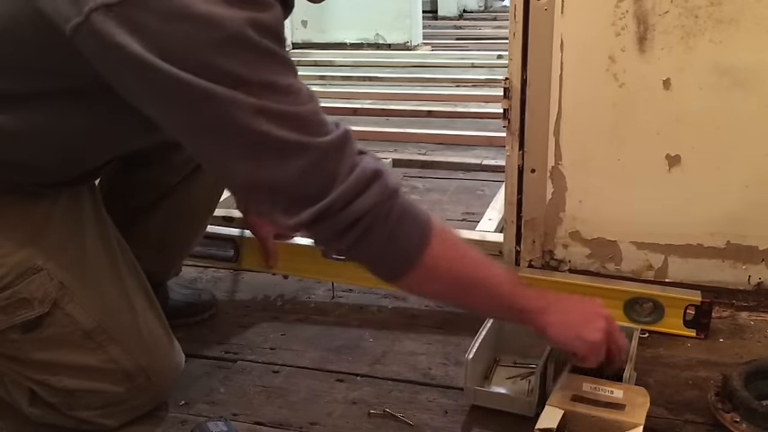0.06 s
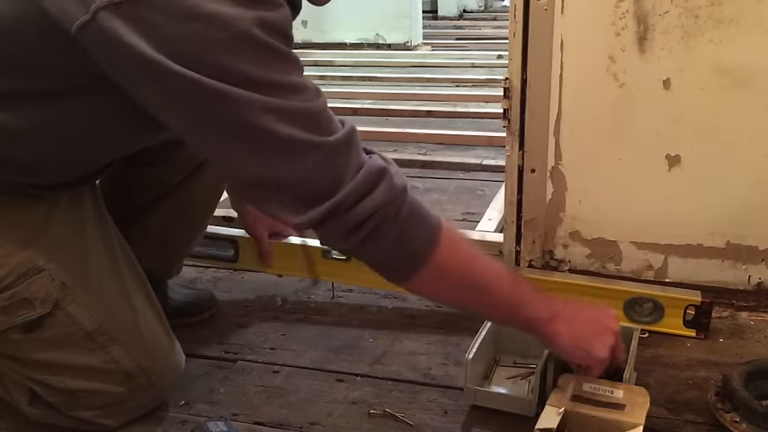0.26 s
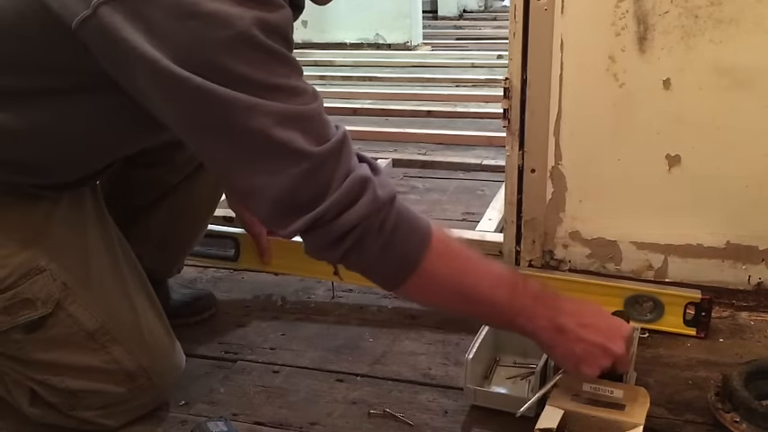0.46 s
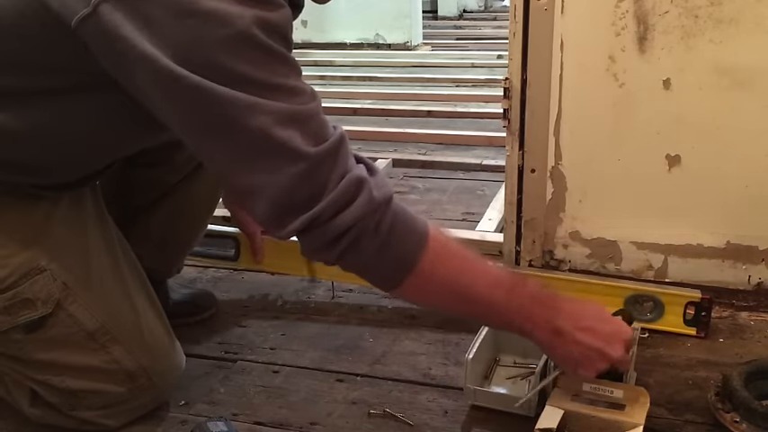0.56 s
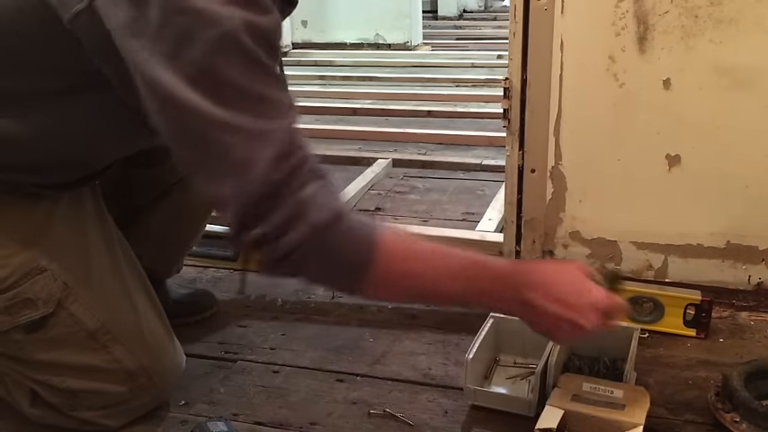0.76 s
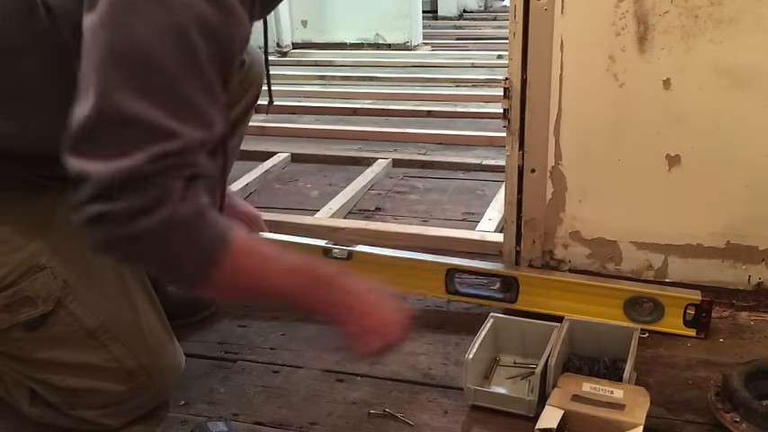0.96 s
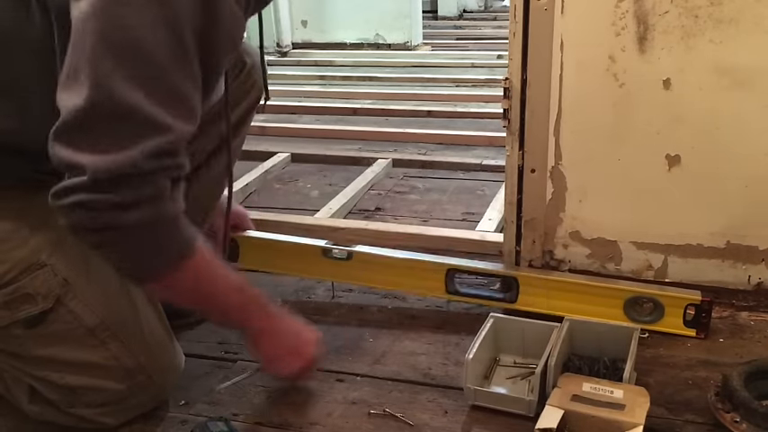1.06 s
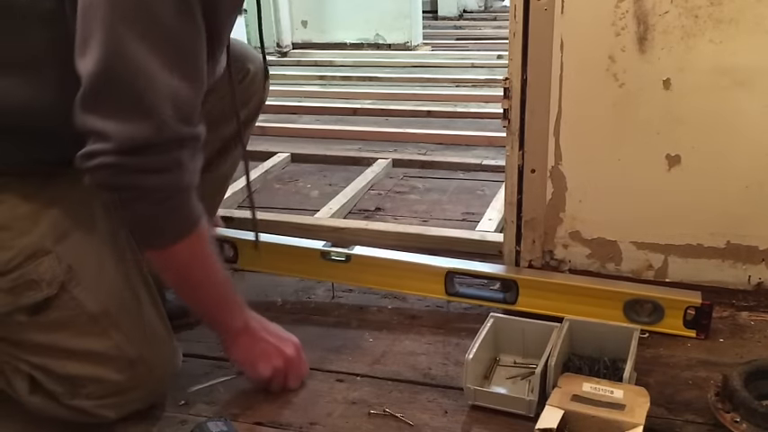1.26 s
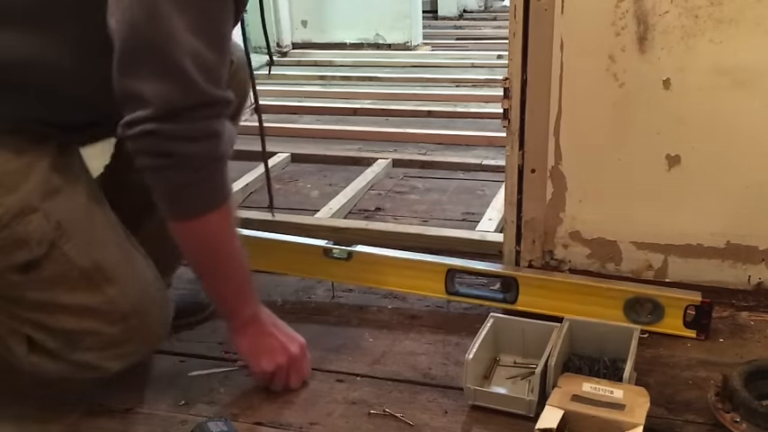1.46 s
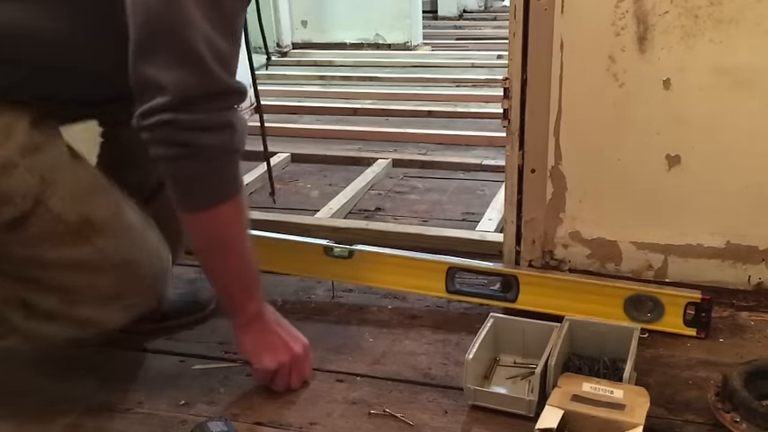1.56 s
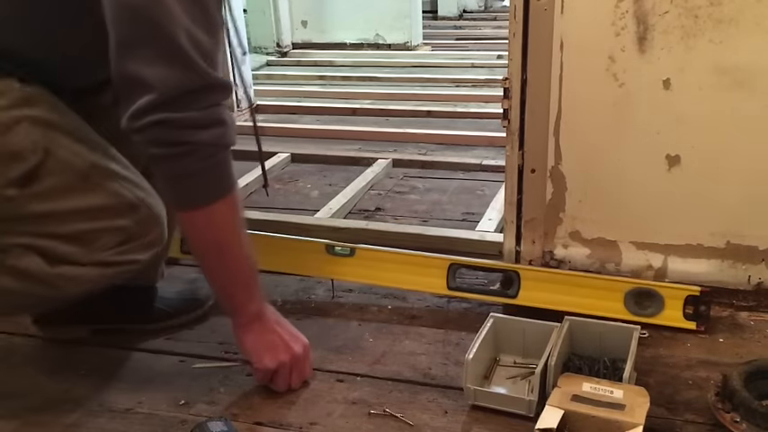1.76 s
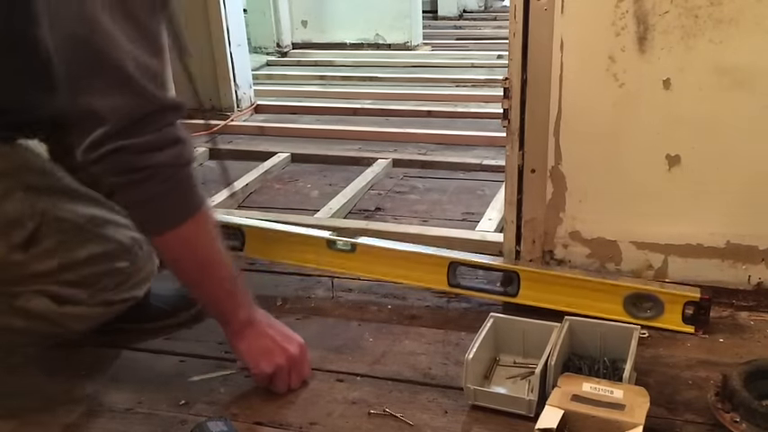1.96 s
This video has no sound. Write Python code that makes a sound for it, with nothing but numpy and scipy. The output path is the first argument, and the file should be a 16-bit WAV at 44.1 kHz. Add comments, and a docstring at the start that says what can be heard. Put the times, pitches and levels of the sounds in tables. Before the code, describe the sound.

Loose steel screws clatter and clink in a small plastic bin, then one long screw bounces on floorboards with a brief high ring; cloth rustle and boot thuds follow in a bare room, phone a few metres away.

```python
"""Bare room with a wooden floor, phone a few metres away: faint air and rumble lie under two seconds.
A hand stirs screws in a plastic bin: noise grains, knocks and clinks excite plastic and steel resonances.
One long screw falls out: its bounces tap the boards, two wavering tones ring on; small ticks on the boards.
Clothes rustle in coloured noise and the worker shifts weight: soft pushes ring the boards as thuds.
Late on, a boot heel knocks, its sole scuffs in gritty noise and a board squeaks, a tone of gliding pitch."""
import sys
import numpy as np
from scipy import signal
from scipy.fft import rfft, irfft
from scipy.io import wavfile
from scipy.ndimage import uniform_filter1d

SR = 44100
rng = np.random.default_rng(int(sys.argv[2]) if len(sys.argv) > 2 else 0)


def bounce(signal):
    """Save signal as a 16-bit WAV file at the path given by the first command-line argument."""
    frames = np.transpose(np.atleast_2d(signal))
    limited = np.clip(frames, -1, 1)
    pcm = np.round(limited * 32767).astype(np.int16)
    wavfile.write(sys.argv[1], SR, pcm)


def undo_db(level):
    """Turn decibels back into plain size, where 20 dB means ten times bigger."""
    steps = np.asarray(level, float) / 20
    return 10 ** steps


N = 88200  # samples, two seconds
# Levels in the tables are relative: the functions that play them may add an offset.


def shape(x, table):
    """Causal minimum-phase filter with the colour of (frequency, level) points, power gain 1."""
    hz, db = np.array(table).T
    log_hz = np.log(np.arange(2049) * SR / 4096 + 1)
    cepstrum = irfft(np.interp(log_hz, np.log(hz), db) * np.log(10) / 20)
    # folding the cepstrum makes the response causal
    cepstrum[1:2048] *= 2
    cepstrum[2049:] = 0
    response = irfft(np.exp(rfft(cepstrum)))
    return signal.fftconvolve(x, response / np.sqrt(np.sum(response ** 2)))[:len(x)]


def ring(x, hz, t60):
    """One resonant mode, excited by x, that decays by 60 dB in t60 seconds."""
    pole = np.exp((2j * np.pi * hz - np.log(1000) / t60) / SR)
    return signal.lfilter([1], [1, -pole], x).imag


def unit(x):
    """Scales a signal to rms 1."""
    return x / np.sqrt(np.mean(x ** 2))


def curve(table, order, lasts=False):
    """Gain over time from a dB column; -120 dB outside the table unless the end values last."""
    points = np.array(table)
    edge = None if lasts else -120
    return undo_db(np.interp(np.arange(N) / SR, points[:, 0], points[:, order], edge, edge))


def blow(s, db, contact_s, rise_s=.0001, solid=0):
    """A short contact: a clean click (solid) at the head of noise that rises and decays."""
    x, start, t = np.zeros(N), int(s * SR), np.arange(2048) / SR
    burst = rng.standard_normal(len(t)) * np.exp(-t / contact_s) * (1 - np.exp(-(t + 1 / SR) / rise_s))
    burst[0] += solid * np.sqrt(np.sum(burst ** 2))
    burst = undo_db(db) * burst / np.sqrt(np.sum(burst ** 2))
    x[start:start + len(t)] = burst[:N - start]
    return x


def flicker(rate, db):
    """Random gain around 0 dB with rms deviation db, heading for a new value rate times a second."""
    k = int(SR / rate)
    steps = np.repeat(rng.standard_normal(N // 50), k)[:N]
    return undo_db(db * unit(uniform_filter1d(steps, k)))


def lean(x, hz, db):
    """Where a blow lands favours the region near hz over the octaves either side."""
    return shape(x, [(hz / 2, -db), (hz, 0), (hz * 2, -db)])


# colour of the room's air: (frequency [Hz], level [dB])
AIR_COLOUR = [(71, -27), (120, -2.5), (273, -7), (466, -14.5), (1250, -19.5), (1930, -21), (13600, -48.5),
              (16300, -78)]


def room_air():
    """Steady noise with the colour of the air in the bare room."""
    return undo_db(-56) * shape(rng.standard_normal(N), AIR_COLOUR)


# low rumble: (time [s], deep band level [dB], upper band level [dB])
RUMBLE_LEVELS = [(0.0, -50, -61.5), (0.27, -77, -48.5), (0.31, -57, -57.5), (0.7, -63, -52.5),
                 (0.83, -52.5, -56), (0.93, -71, -49.5), (1.1, -59, -59.5), (1.2, -52, -56.5),
                 (1.53, -60, -55), (1.84, -49, -52), (1.89, -44, -54), (2.0, -43, -62)]
# colours of the two bands: (frequency [Hz], level [dB])
DEEP_RUMBLE_COLOUR = [(10, -122), (20, 3), (45, 25.5), (60, -16), (80, -33.5)]
UPPER_RUMBLE_COLOUR = [(45, -35.5), (65, -3.5), (90, -1), (115, 2.5), (150, -42.5)]


def low_rumble():
    """Two bands of low noise whose levels wander separately."""
    deep = curve(RUMBLE_LEVELS, order=1, lasts=True) * shape(rng.standard_normal(N), DEEP_RUMBLE_COLOUR)
    upper = curve(RUMBLE_LEVELS, order=2, lasts=True) * shape(rng.standard_normal(N), UPPER_RUMBLE_COLOUR)
    return deep + upper


# stirring: (time [s], bin level [dB], brightness [dB], wall ring level [dB])
STIRRING = [(0.175, -26.5, -12, 7), (0.178, -29.5, -6.5, -18), (0.186, -34.5, -20, -14),
            (0.216, -30.5, -19, 3.5), (0.244, -30.5, -24, -12), (0.27, -27, -13.5, 2),
            (0.305, -24, -21, -17), (0.398, -53.5, -16, 2), (0.428, -33, -8, -13), (0.46, -34.5, -33, -0.5),
            (0.514, -43.5, -42, -13), (0.526, -42, -10.5, -2.5), (0.65, -75, -31, 16)]


def stir_level():
    """Gain of the stirring hand over time."""
    return curve(STIRRING, order=1) * undo_db(-5)


def rattle():
    """Dense small collisions at random; returns noise grains for the plastic and for the steel."""
    rattles_per_s, spread_db, decay_s = 800, 2.6, .0005
    chance, strength = rng.random((N, 2)).T
    hits = (chance < rattles_per_s / SR) * undo_db(-spread_db * np.log(1 - strength))
    env = signal.lfilter([1], [1, -np.exp(-1 / SR / decay_s)], hits)
    low, high = (unit(env * rng.standard_normal(N)) * stir_level() for _ in range(2))
    return low, high * curve(STIRRING, order=2) * undo_db(5)


# screws knocking the bin wall: (time [s], level [dB], brightness [dB], favoured frequency [Hz])
WALL_KNOCKS = [(0.178, -12.5, -7.5, 2535), (0.188, -14.5, -8, 1010), (0.208, -19, -13, 1040),
               (0.238, -13, 3.5, 1210), (0.277, -15.5, -22, 1260), (0.293, -12.5, -12, 935),
               (0.299, -8, -19, 1026), (0.422, -15, -17, 2570), (0.431, -16, -18, 1150),
               (0.454, -20.5, 5.5, 1090), (0.478, -24.5, -10, 950), (0.522, -25, 2, 2235),
               (0.532, -23.5, -20, 1620), (0.548, -34.5, -19, 1720)]


def knocks():
    """Louder blows with a short ring at each spot; returns a part for the plastic and for the steel."""
    low, high = np.zeros(N), np.zeros(N)
    for s, db, bright_db, hz in WALL_KNOCKS:
        hit = blow(s, db + 4.5, 0.00066, rise_s=0.00014, solid=0.79)
        low = low + lean(hit, hz, db=3.5) + undo_db(-22) * ring(hit, hz, t60=.015)
        high = high + hit * undo_db(bright_db - 7)
    return low, high


# broad colour of the plastic bin: (frequency [Hz], level [dB])
BIN_COLOUR = [(130, -26.5), (286, -17), (471, -34.5), (690, -14), (1030, -9.5), (1350, -10), (1760, -9.5),
              (3130, -13.5), (5000, -25.5), (6500, -75)]
# wall resonances, whose t60 is 1.3 / width: (frequency [Hz], nominal width [Hz], level [dB])
BIN_WALLS = [(920, 47, -17), (1000, 84, -12), (1040, 21.5, 9), (1150, 130, 25)]


def plastic(x):
    """The bin's broad colour plus wall resonances that together carry the energy of their drive."""
    drive = x * curve(STIRRING, order=3, lasts=True)
    walls = sum(undo_db(db) * ring(drive, hz, 1.3 / width) for hz, width, db in BIN_WALLS)
    return shape(x, BIN_COLOUR) + walls / np.sqrt(np.sum(walls ** 2) / np.sum(drive ** 2))


# clinks of short screws: (time [s], frequency [Hz], level [dB])
SCREW_CLINKS = [(0.18, 5600, -42), (0.233, 9000, -36), (.237, 14360, -32), (0.242, 5600, -48),
                (.281, 12230, -47), (0.346, 13800, -65), (.411, 15000, -39), (0.42, 11540, -35),
                (.434, 11620, -41), (0.447, 7461, -40), (0.453, 8872, -38), (.454, 14140, -41),
                (.467, 14980, -42), (0.542, 8872, -63)]


def clinks():
    """Short screws struck one by one, each blow ringing one steel mode."""
    return sum(ring(blow(s, db + 1.5, 0.00028, solid=1.8), hz, t60=.045) for s, hz, db in SCREW_CLINKS)


def pings():
    """Screws touching at random, each touch ringing one short steel mode of the clinks."""
    touches_per_s, spread_db, t60 = 70, 3, .01  # rate is for each mode
    gain = stir_level() * curve(STIRRING, order=2)
    out = 0
    for mode_hz in sorted({hz for s, hz, db in SCREW_CLINKS}):
        chance, strength = rng.random((N, 2)).T
        touches = unit((chance < touches_per_s / SR) * undo_db(-spread_db * np.log(1 - strength)))
        # the root evens out the energy that the ringing adds
        out = out + ring(touches * gain, mode_hz, t60) * np.sqrt(4 * np.log(1000) / t60 / SR)
    return undo_db(-5) * out / 3


# colour of the steel's clatter: (frequency [Hz], level [dB])
STEEL_COLOUR = [(3000, -67), (4500, 0), (7000, -3), (9200, -6), (10300, -13), (11500, -6.5), (14500, -19),
                (16200, -13)]


def rummage():
    """Stirred screws: collisions and knocks heard through plastic and as steel, with clinks and pings."""
    rattle_low, rattle_high = rattle()
    knock_low, knock_high = knocks()
    clatter = shape(rattle_high + knock_high, STEEL_COLOUR)
    return plastic(rattle_low + knock_low) + clatter + clinks() + pings()


# bounces of the fallen screw: (time [s], level [dB], brightness [dB], favoured frequency [Hz])
SCREW_BOUNCES = [(0.674, -18, -11, 1040), (0.6942, -20, -14.5, 1090), (0.698, -17.5, -17, 1000),
                 (0.739, -25.5, -9, 1000), (0.7699, -4.5, -7.5, 1680), (.773, -17.5, -43, 1570)]
# colours of the tap on the boards and of its treble: (frequency [Hz], level [dB])
BOARD_TAP_COLOUR = [(300, -19), (500, -10.5), (700, 1), (1100, 8.5), (1700, 3.5), (2200, -2), (3400, 3),
                    (4300, 3.5), (5200, -38), (7000, -30)]
TAP_TREBLE_COLOUR = [(3000, -29), (5000, 6), (7500, -2.5), (12200, -11.5), (13000, -14), (16000, -26)]


def bounces():
    """Each bounce taps the boards, with a separate treble part."""
    out = 0
    for s, db, bright_db, hz in SCREW_BOUNCES:
        hit = blow(s, db + 11, .0003, solid=2.5)
        out = out + shape(lean(hit, hz, db=7.5), BOARD_TAP_COLOUR)
        out = out + undo_db(bright_db - 2) * shape(hit, TAP_TREBLE_COLOUR)
    return out


# faint modes of the long screw: (frequency [Hz], level [dB], t60 [s])
FAINT_MODES = [(13160, -45, .06), (13890, -46, .07), (14800, -48, .04)]
# colour of the steel crack: (frequency [Hz], level [dB])
CRACK_COLOUR = [(8000, -35), (11500, 12), (15500, -3)]


def first_impact():
    """The first bounce also cracks brightly and kicks the screw's faint modes."""
    first_s = SCREW_BOUNCES[0][0]
    kick = blow(first_s, 7.0, 0.00024, solid=3.3)
    modes = sum(undo_db(db) * ring(kick, hz, t60) for hz, db, t60 in FAINT_MODES)
    return modes + shape(blow(first_s, -18.5, 0.0023), CRACK_COLOUR)


# two long modes swell and fade as the screw tumbles: (time [s], high level [dB], low level [dB])
TUMBLING = [(.674, -47, -70), (.684, -46, -50), (.69, -43, -42), (.71, -37, -42), (.736, -41, -47),
            (.745, -43, -62), (.755, -44, -51), (.769, -46, -54), (.771, -31, -54), (.8, -43, -55),
            (.81, -60, -70), (.845, -64, -90), (.86, -54, -90), (.89, -62, -90), (.94, -78, -90)]


def screw_ring():
    """The long screw's two lasting modes waver in level and phase as it spins."""
    low_hz, high_hz = 6157, 11968
    t = np.arange(N) / SR + 1e-5 * np.log(flicker(60, 9))  # jittered clock
    high = curve(TUMBLING, order=1) * np.sin(2 * np.pi * high_hz * t)
    low = curve(TUMBLING, order=2) * np.sin(2 * np.pi * low_hz * t)
    return np.sqrt(2) * flicker(90, 2.2) * (high + low)


# level of the clothes: (time [s], level [dB])
RUSTLE_LEVEL = [(.95, -64.5), (1.04, -65), (1.17, -82), (1.19, -61), (1.31, -69.5), (1.34, -60.5),
                (1.42, -60.5), (1.55, -65), (1.69, -62.5), (1.8, -67), (1.89, -58.5), (2.0, -66.5)]
# colour of the cloth: (frequency [Hz], level [dB])
CLOTH_COLOUR = [(290, -22), (500, -13.5), (1040, -7.5), (1290, -9.5), (8720, -23), (14500, -32),
                (16300, -65)]


def cloth_rustle():
    """Flickering noise of moving clothes, growing steeply from silence to its first level point."""
    fade_in = np.clip(np.arange(N) / SR / RUSTLE_LEVEL[0][0], 0, 1) ** 8
    level = undo_db(4) * curve(RUSTLE_LEVEL, order=1, lasts=True) * flicker(60, 1.5)
    return fade_in * level * shape(rng.standard_normal(N), CLOTH_COLOUR)


# small ticks on the boards: the fallen screw, and at 1.858 s a boot heel's knock:
# (time [s], level [dB], frequency [Hz])
SMALL_TICKS = [(.925, -45, 8500), (1.032, -48, 4250), (1.116, -42, 4250), (1.323, -40, 5600),
               (1.858, -35, 2010)]


def small_ticks():
    """Small contacts of screw or boot heel on the boards, each coloured by a narrow peak."""
    out = 0
    for s, db, hz in SMALL_TICKS:
        colour = [(300, -35), (hz / 1.2, -9), (hz, 0), (hz * 1.1, -9), (16000, -24)]
        out = out + shape(blow(s, db + 7.5, 0.00095, solid=1.8), colour)
    return out


# thuds of boot and knee: (time [s], level [dB], extra level of modes above 280 Hz [dB])
BOOT_THUDS = [(1.184, -32.5, 2.5), (1.19, -27, -7), (1.216, -34, -24), (1.399, -35, -17),
              (1.439, -39.5, -27), (1.497, -46, 8.5), (1.527, -55, 13.5), (1.857, -21, 3), (1.868, -20, -7),
              (1.884, -19.5, -3), (1.92, -26.5, -14), (1.963, -28.5, -15)]
# modes of the floorboards: (frequency [Hz], level [dB], t60 [s])
BOARD_MODES = [(144, 2.5, 0.1), (164.3, 0.5, 0.069), (236, -2.5, 0.057), (299, -7.5, 0.091),
               (335, -1, 0.046), (404, -5, 0.15), (544, -7, 0.065)]


def board_thuds():
    """Soft pushes ring the board modes, each push a little differently in level and pitch."""
    out, n = 0, int(.0016 * SR)  # length of a push
    for s, db, upper_db in BOOT_THUDS:
        push, start = np.zeros(N), int(s * SR)
        push[start:start + n] = undo_db(db - 15) * np.hanning(n) / np.sqrt(n)
        for k, (hz, mode_db, t60) in enumerate(BOARD_MODES):
            level_shift, pitch_shift = rng.standard_normal(2)
            gain = undo_db(mode_db + upper_db * (hz > 280) + 2 * level_shift)
            # neighbouring modes have opposite sign
            out = out + (-1) ** k * gain * ring(push, hz * (1 + .015 * pitch_shift), t60)
    return signal.sosfilt(signal.butter(2, 110, "high", fs=SR, output="sos"), out)


# a boot sole on the boards: (time [s], level [dB])
SCUFF_LEVEL = [(1.857, -43), (1.859, -30.5), (1.87, -62), (1.93, -50), (1.96, -47.5), (2.03, -55)]
# colour of the friction: (frequency [Hz], level [dB])
SOLE_COLOUR = [(380, -41.5), (650, 7.5), (712, -8.5), (1130, -7), (1470, -14.5), (1940, -14.5),
               (2210, -11.5), (4000, -34.5), (5200, -51)]


def scuff():
    """Gritty friction of the sole: coloured noise with a fast flicker."""
    return curve(SCUFF_LEVEL, order=1) * flicker(200, 3.26) * shape(rng.standard_normal(N), SOLE_COLOUR)


# a squeaking board: (time [s], frequency [Hz], level [dB])
BOARD_SQUEAK = [(1.925, 541, -61), (1.95, 515, -53), (1.97, 488, -38.5), (1.985, 554, -38),
                (2.04, 670, -18)]


def squeak():
    """A board squeaks: a sine that glides, with slightly unsteady pitch and level."""
    points = np.array(BOARD_SQUEAK)
    hz = np.interp(np.arange(N) / SR, points[:, 0], points[:, 1]) * flicker(150, .25)
    phase = 2 * np.pi * np.cumsum(hz) / SR
    return curve(BOARD_SQUEAK, order=2) * flicker(120, 2.5) * np.sin(phase)


# echoes off floor, bins and wall close by: (lag [s])
CLOSE_LAGS = [.00032, .00075, .0013]


def room(x):
    """Close echoes smear each contact; a diffuse tail, thin in the bass, loses treble sooner."""
    t60, treble_t60, gap_s, echo_gain = 0.34, 0.26, .004, .68
    for lag_s in CLOSE_LAGS:
        allpass = np.zeros(int(lag_s * SR) + 1)
        allpass[0], allpass[-1] = 1, -echo_gain
        x = signal.lfilter(allpass[::-1], allpass, x)
    t = np.arange(SR // 2) / SR
    noise = rng.standard_normal(len(t))
    low = signal.sosfilt(signal.butter(2, 5000, fs=SR, output="sos"), noise)
    tail = low * undo_db(-60 * t / t60) + (noise - low) * undo_db(-60 * t / treble_t60)
    tail = signal.sosfilt(signal.butter(1, 250, "high", fs=SR, output="sos"), tail * (t > gap_s))
    return x + undo_db(-2) * signal.fftconvolve(x, tail / np.sqrt(np.sum(tail ** 2)))[:N]


def scene():
    """Contacts sound in the room; the screw's long ring, air, rumble and cloth are added directly."""
    fallen_screw = bounces() + first_impact()
    contacts = rummage() + fallen_screw + small_ticks() + board_thuds() + scuff() + squeak()
    background = room_air() + low_rumble() + cloth_rustle()
    return (room(contacts) + screw_ring() + background)[None]


def roll_off(x):
    """The treble ends steeply here."""
    return signal.sosfilt(signal.butter(12, 16480, fs=SR, output="sos"), x)


def record(dry):
    """The phone, a few metres away, cuts the top above 16 kHz."""
    top_cut = signal.ellip(8, .2, 60, 16000, fs=SR, output="sos")
    mix = signal.sosfilt(top_cut, dry)
    return roll_off(mix)


dry = scene()
out = record(dry)
bounce(out)
```